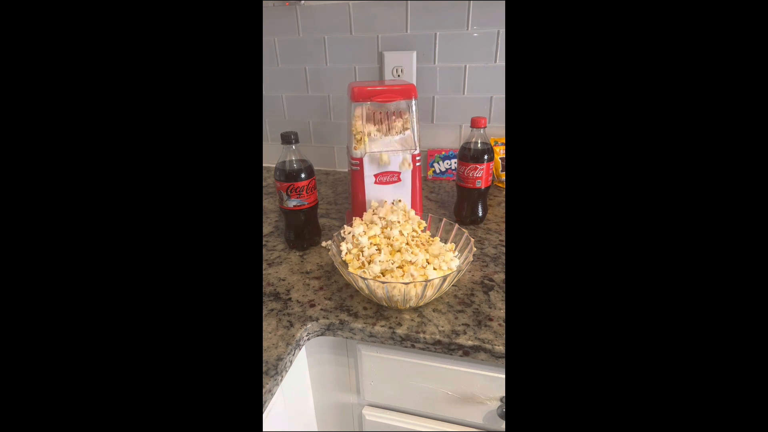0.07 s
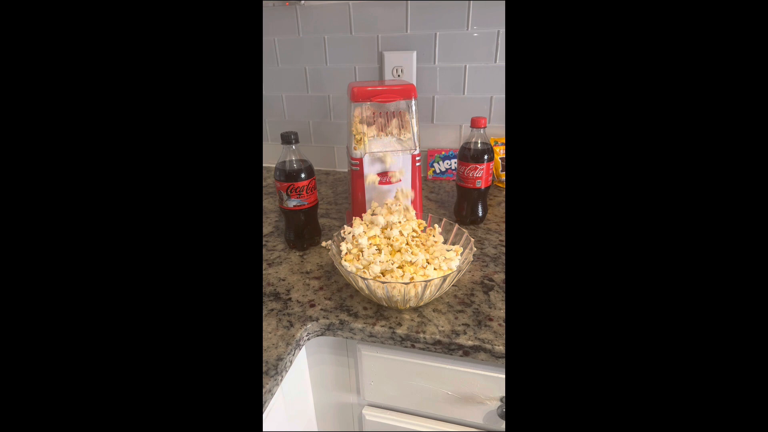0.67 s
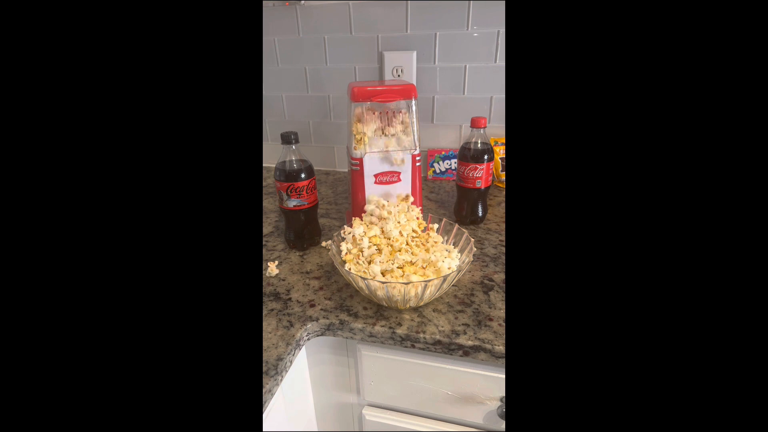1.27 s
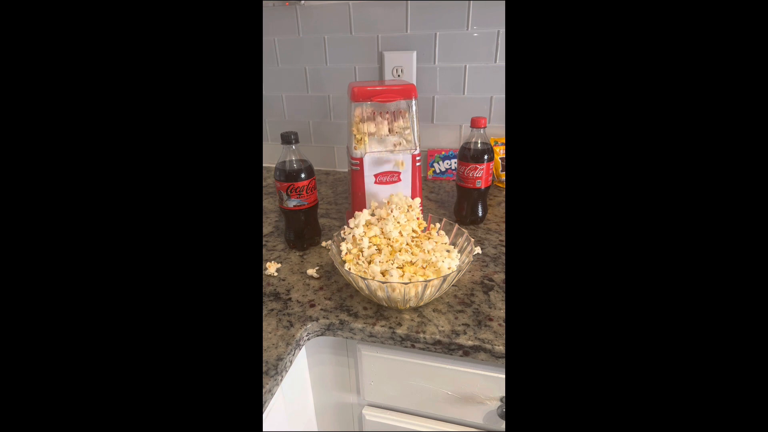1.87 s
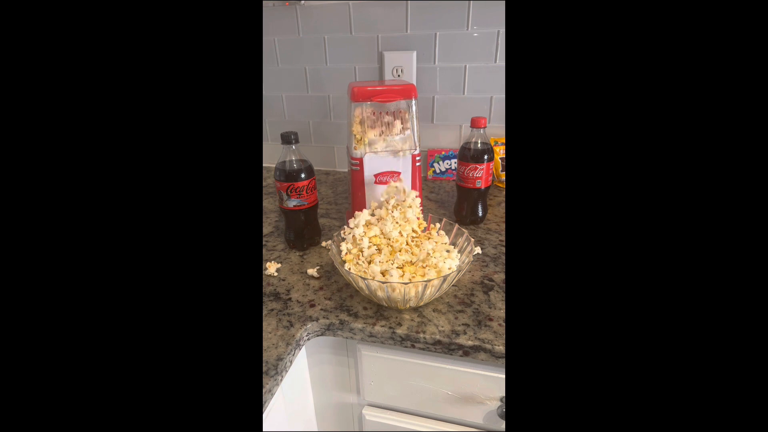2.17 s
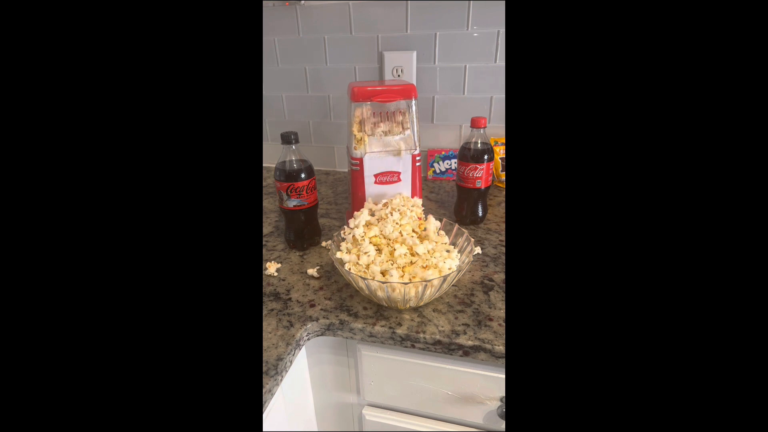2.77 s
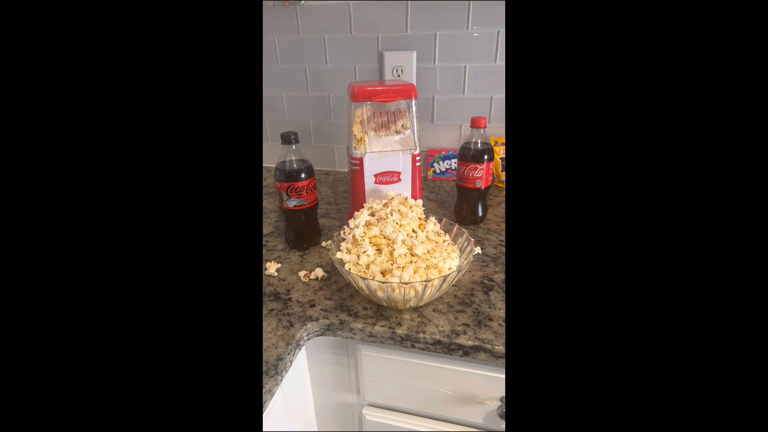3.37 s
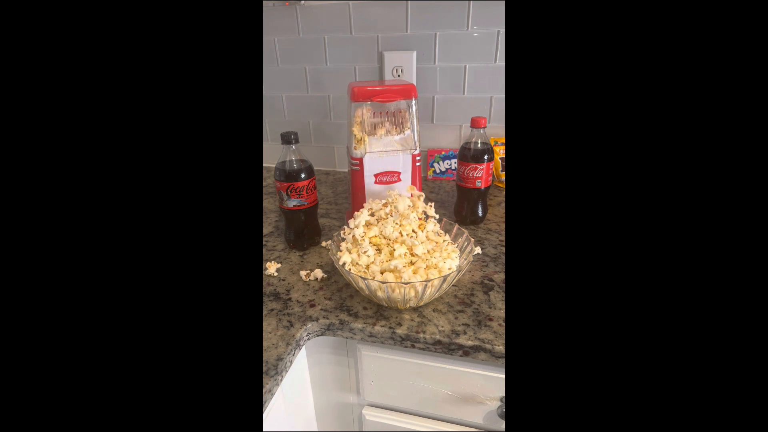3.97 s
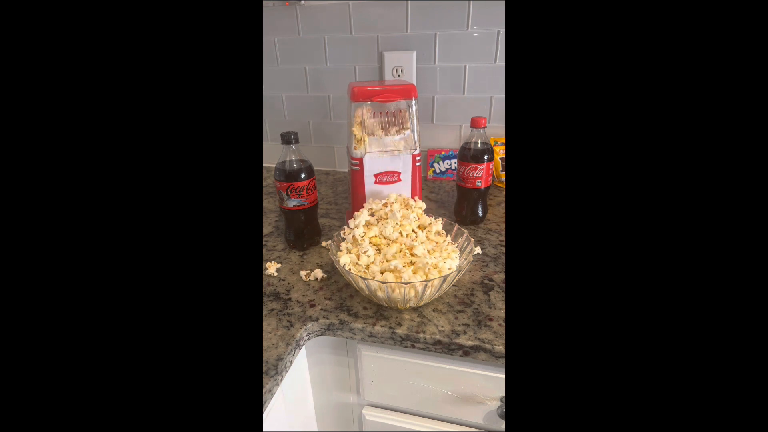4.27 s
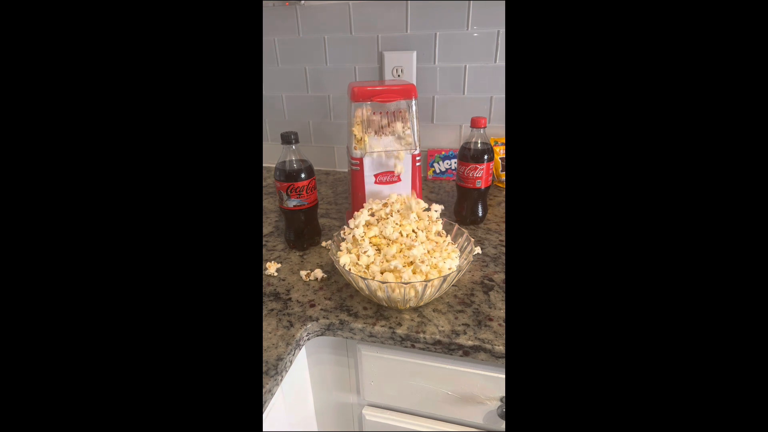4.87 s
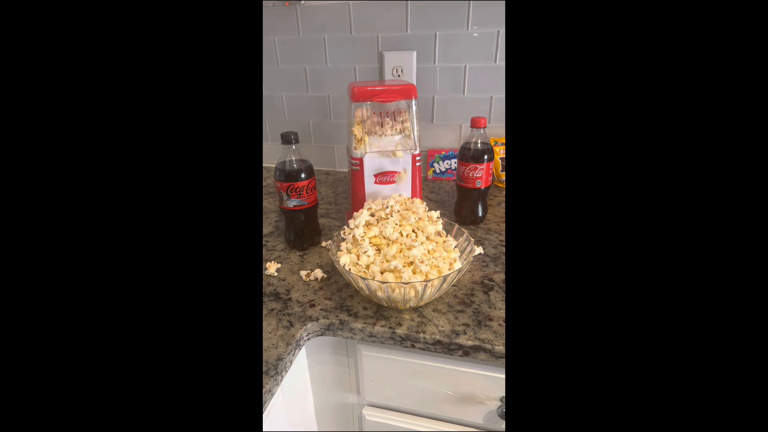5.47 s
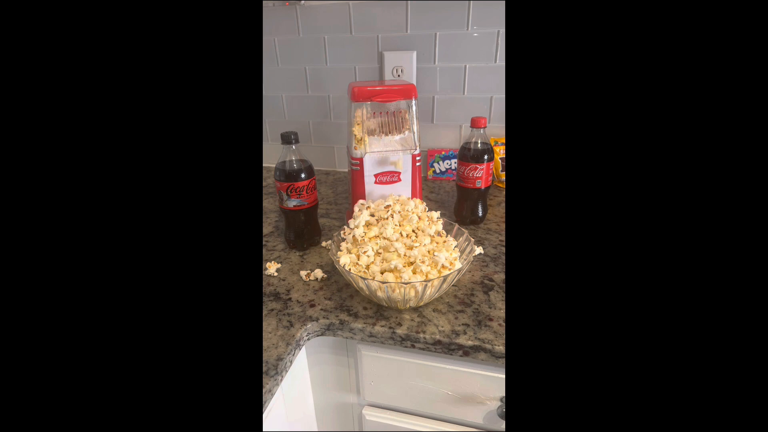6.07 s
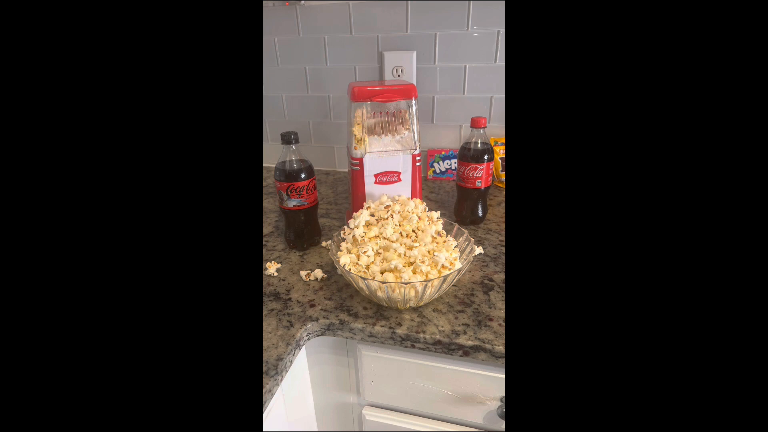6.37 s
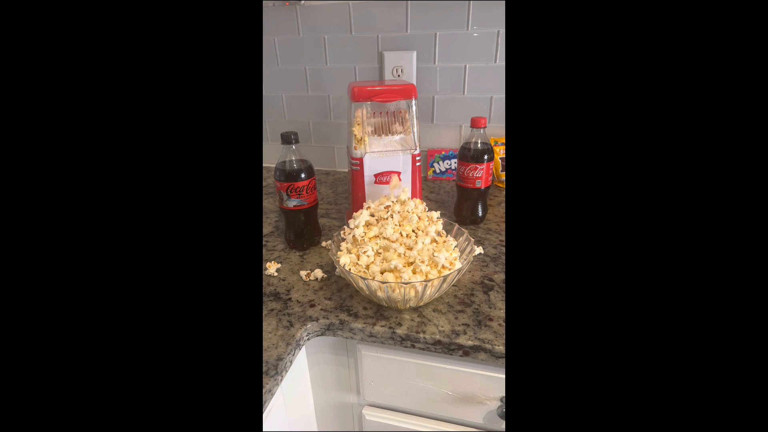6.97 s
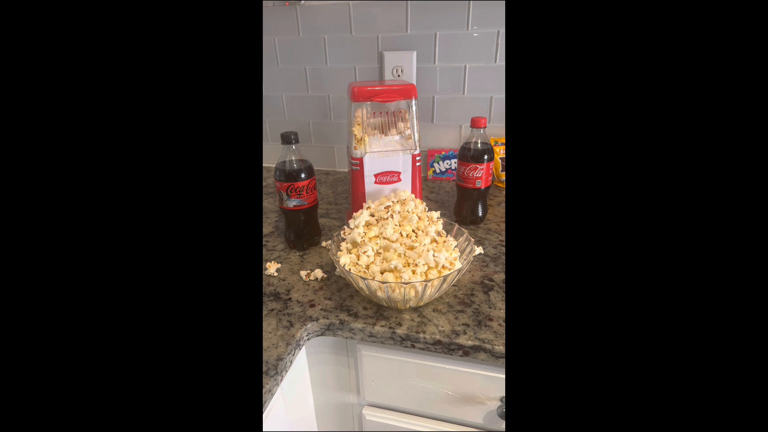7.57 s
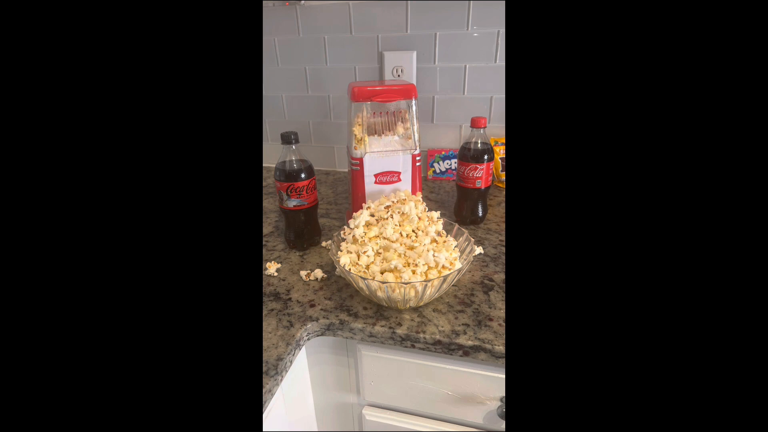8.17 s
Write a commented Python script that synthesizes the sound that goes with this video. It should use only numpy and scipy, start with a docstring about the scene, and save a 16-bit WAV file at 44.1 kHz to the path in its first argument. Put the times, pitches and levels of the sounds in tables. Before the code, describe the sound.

A hot-air popcorn maker runs about a metre away in a tiled kitchen, with a steady motor hum, rushing air and a light metallic rattle of circling kernels. Corn pops quickly and irregularly, each pop a sharp snap with a hollow thump, with a few faint pings and one plastic clack. The popping thins and breaks off after a last flurry. Soft, dry rustles and one late pop follow as the fan keeps running.

```python
"""Tiled kitchen, stone counter: a hot-air popcorn maker runs a metre away.
The motor hums, air rushes through the chamber, the last kernels rattle round the metal cup.
Each pop is one chain: the hull snaps, steam sputters, the swelling kernel thumps the chamber and
kicks the cup. Harder snaps are brighter and spit more steam. Kernels ping the rim, one clacks on
the plastic hood, flakes rustle down the chute; the popping thins out and nearly stops."""
import sys
import numpy as np
from scipy import signal
from scipy.fft import rfft, irfft
from scipy.io import wavfile
from scipy.ndimage import uniform_filter1d

SR = 44100
rng = np.random.default_rng(int(sys.argv[2]) if len(sys.argv) > 2 else 0)


def store_wav(level_fs):
    """Save 16-bit WAV to argv[1]."""
    pcm = np.round(np.clip(np.atleast_2d(level_fs), -1, 1) * 32767)
    wavfile.write(sys.argv[1], SR, pcm.T.astype(np.int16))


N = 362502
TIME_S = np.arange(N) / SR

# motor and impeller tones: shaft_multiple, rms_db
MOTOR_TONES = [(1, -40), (2, -43), (5, -43), (6, -55), (7, -59), (9, -58.5), (10, -55.5), (18, -66),
               (20, -65), (26, -65), (37, -67), (40, -66), (47, -69), (49, -68), (50, -65)]
# shaft speed: time_s, rate_hz
SHAFT_SPEED = [(0, 181), (1.6, 179.2), (4.6, 177.4), (8.2, 178.7)]
# broad air rush: freq_hz, gain_db
RUSH_SPECTRUM = [(20, -29), (40, -4), (60, 5), (130, 3), (200, 0.5), (290, 5), (560, 5.5), (1000, -5),
                 (1300, -16.5), (1900, -9.5), (4500, -14), (9000, -17.5), (12000, -25.5), (15500, -35)]
# duct resonances: pitch_hz, nominal_width_hz, gain_db
DUCT_MODES = [(354.1, 20.8, 2), (409, 24.3, 0.5), (649.6, 55, 0), (695.5, 11.9, 1.5), (859, 28.6, -2.5),
              (896.4, 11, -1.5), (1065, 97, -12.5)]
# cup modes under circling kernels: pitch_hz, gain_db, t60_s
RATTLE_MODES = [(1462, -1, .035), (1528, 0, .035), (3775, -2.5, .055), (4630, -13, .03), (5270, -14, .025),
                (6370, -16, .05)]
# bursting kernels, relative levels: start_s, snap_db, thump_db, knock_db
POP_EVENTS = [(0.0373, -15.5, -26, -22), (0.0528, -17, -11, -32), (0.1251, -15.5, -12.5, -15.5),
              (0.2329, -15, -14.5, -23), (0.303, -7, -23, -35), (0.3443, -11.5, -24, -46),
              (0.382, -12.5, -14.5, -23), (0.403, -4.5, -11.5, -38), (0.4359, -16.5, -7.5, -25),
              (0.505, -11, -21, -21.5), (0.5954, -21.5, -20, -21), (0.6613, -15.5, -9, -14),
              (0.7277, -9, -17.5, -20.5), (0.7575, -13, -12, -21), (0.8274, -17, -14, -22),
              (0.9535, -17.5, -13, -29), (1.0538, -2, -17.5, -24), (1.1384, -7.5, -8.5, -24),
              (1.1575, -13, -7.5, -19), (1.2062, -12, -16, -20), (1.3633, -10.5, -22, -20),
              (1.398, -12, -8.5, -11), (1.4913, -15, -21, -26), (1.4971, -4, -15.5, -20),
              (1.518, -9, -17, -21), (1.5432, -10.5, -10.5, -20), (1.5564, -14, -10, -22),
              (1.6209, -17.5, -14.5, -29), (1.7727, -16, -8.5, -18), (1.8076, -15.5, -12, -20),
              (1.9, -15, -16.5, -26), (1.9786, -5.5, -24, -37), (2.1067, -13.5, -11, -21),
              (2.1245, -11, -19, -18.5), (2.166, -3.5, -25, -30), (2.1868, -10, -15, -24),
              (2.2284, -17, -10.5, -32), (2.3294, -12, -31, -22.5), (2.4435, -21, -21.5, -21.5),
              (2.478, -9.5, -18, -19), (2.532, -12, -26, -41), (2.6104, -8.5, -14.5, -40),
              (2.7562, -13.5, -13.5, -17.5), (2.8881, -7, -31, -23), (2.903, -12.5, -11, -23),
              (3.029, -3.5, -23, -26), (3.068, -21, -15.5, -23), (3.2249, -9, -19.5, -19),
              (3.4051, -18.5, -27, -45), (3.4375, -5, -20, -42), (3.465, -6.5, -16, -26),
              (3.4835, -22, -10, -36), (3.694, -20.5, -10.5, -15.5), (3.8994, -23, -20, -48),
              (3.9645, -3.5, -25, -48), (4.0842, -12.5, -13, -33), (4.135, -4, -27, -31),
              (4.59, -5, -26, -32), (4.6279, -8, -21.5, -27), (4.7053, -15.5, -10.5, -13),
              (5.0564, -5.5, -23, -22.5), (5.1677, -9, -14.5, -39), (5.2668, -7, -14, -25),
              (5.2833, -8.5, -11, -30), (5.3057, -2.5, -17.5, -25), (5.4799, 2, -27, -25),
              (5.4915, -7, -20.5, -29), (7.5034, -5.5, -11, -22)]
# crack heard through the hood: freq_hz, gain_db
CRACK_SPECTRUM = [(40, -68), (200, 6.5), (700, 0), (1300, -3), (1900, -12), (2300, 2.5), (2650, -7),
                  (3150, 3.5), (4000, 1.5), (4900, -1), (5600, -3), (6600, 3), (7800, 4), (11000, -2.5),
                  (15500, -13.5)]
# hood ring after a snap: pitch_hz, gain_db, t60_s
HOOD_MODES = [(2250, -18.5, 0.036), (3110, -3, 0.012), (4760, -9.5, 0.014), (5466, 0, 0.017),
              (5905, 1, 0.016), (7470, -2, 0.01), (8630, -5.5, 0.018), (10920, -4, 0.011)]
# air modes of chamber and hood: pitch_hz, gain_db, t60_s
CHAMBER_MODES = [(102.6, -13.5, 0.1), (116.1, -21, 0.22), (256, -12, 0.11), (359, -3.5, 0.16),
                 (382, -2.5, 0.11), (411.2, 1.5, 0.14), (459, -6.5, 0.059), (570, -33, 0.04),
                 (658, -7, 0.084), (696.5, -4.5, 0.085), (848, -1, 0.029), (1192, -25, 0.028)]
# metal cup, kicked: pitch_hz, gain_db, t60_s
CUP_MODES = [(1154, 11.5, 0.057), (1450, -33, .03), (1501, 16, 0.047), (1486, 13.5, 0.12),
             (1425, -28, 0.23), (2230, -35, 0.076)]
# kernels on the cup rim: start_s, level_db
RIM_HITS = [(.129, -25.5), (.833, -27.5), (1.627, -33.5), (2.81, -38), (4.714, -30.5)]
# cup rim: pitch_hz, gain_db, t60_s
RIM_MODES = [(3780, 0, .09), (4160, -5, .06)]
# kernel on the hood: start_s, level_db
HOOD_HITS = [(3.027, -14.5)]
# plastic clack: freq_hz, gain_db
CLACK_SPECTRUM = [(400, -32), (1200, 1), (2400, -4.5), (4500, -9.5)]
# flakes down the chute: start_s, level_db
FLAKE_SLIDES = [(4.33, -61), (5.736, -41.5), (5.967, -48), (6.244, -45), (6.849, -48), (7.295, -49),
                (7.951, -41.5), (8.168, -47)]
# flake rustle: freq_hz, gain_db
FLAKE_SPECTRUM = [(800, -25), (4000, -10), (7500, 5.5), (10500, 2), (15000, -18)]
# stereo width: freq_hz, side_gain_db
SIDE_SPECTRUM = [(25, -15), (60, -34), (200, -37), (380, -15), (700, -6.5), (1300, -8), (3000, -4),
                 (8000, -1), (15000, -1)]
# stereo balance: freq_hz, left_minus_right_db
BALANCE = [(90, 1), (220, 3), (400, 3), (700, 3), (1200, 0), (4000, 0.9), (9000, 0)]


def undb(db):
    """Decibels to gain."""
    return 10 ** (np.asarray(db) / 20)


def unit(x):
    """Scale to rms 1."""
    return x / np.sqrt(np.mean(x ** 2))


def colour(x, curve):
    """Filter by a (freq_hz, gain_db) curve."""
    hz, db = np.transpose(curve)
    bins_hz = np.maximum(np.fft.rfftfreq(x.shape[-1], 1 / SR), 1)
    gain = undb(np.interp(np.log(bins_hz), np.log(hz), db))
    return irfft(rfft(x) * gain, x.shape[-1])


def drift(rate_hz):
    """Smooth random drift, rms 1."""
    hold = int(SR / rate_hz)
    steps = np.repeat(rng.standard_normal(N // hold + 2), hold)
    return unit(uniform_filter1d(uniform_filter1d(steps, hold), hold)[:N])


def add(track, start_s, sound):
    """Mix a sound in at start_s."""
    i = max(int(start_s * SR), 0)
    track[..., i:i + sound.shape[-1]] += sound[..., :N - i]


def fade(t, t60_s):
    """Exponential decay, 60 dB in t60_s."""
    return np.exp(-np.log(1000) * t / t60_s)


def burst(shape, energy_s):
    """Scale to the energy of rms 1 held for energy_s."""
    return shape * np.sqrt(energy_s * SR / np.sum(shape ** 2))


def ring(modes, detune, scatter_db):
    """One blow on damped modes; each blow shifts their pitch and share at random."""
    hz, db, t60_s = np.transpose(modes)[:, :, None]
    t = TIME_S[:SR // 6]
    shift, share = rng.standard_normal((2, len(modes), 1))
    partials = np.sin(2 * np.pi * hz * (1 + detune * shift) * t)
    return np.sum(undb(db + scatter_db * share) * fade(t, t60_s) * partials, axis=0)


def splinter(spectrum, t60_s, ragged_db):
    """Fading spray of tiny fractures: noise with a new level each millisecond."""
    t = TIME_S[:SR // 10]
    knots_s = t[::SR // 1000]
    size_db = ragged_db * np.interp(t, knots_s, rng.standard_normal(len(knots_s)))
    return colour(rng.standard_normal(len(t)) * undb(size_db), spectrum) * fade(t, t60_s)


def stereo(mid, side):
    """Two channels, alike in the bass, apart in the treble."""
    return mid + np.array([[1], [-1]]) * colour(side, SIDE_SPECTRUM)


def kitchen(x, early_db, tail_db, t60_s, treble_t60_s):
    """Sparse reflections off counter and tiles, then the diffuse room tail."""
    t = TIME_S[:SR // 2]
    shape = (2, len(t))
    early = rng.standard_normal(shape) * (rng.random(shape) < .03) * fade(t, .057) * (t > .002)
    low = signal.sosfilt(signal.butter(2, 6500, "low", fs=SR, output="sos"), rng.standard_normal(shape))
    top = signal.sosfilt(signal.butter(2, 6500, "high", fs=SR, output="sos"), rng.standard_normal(shape))
    build_up = np.clip((t - .005) / .018, 0, 1)
    tail = (low * fade(t, t60_s) + top * fade(t, treble_t60_s)) * build_up
    responses = (undb(early_db) * burst(echoes, 1 / SR) + undb(tail_db) * burst(diffuse, 1 / SR)
                 for echoes, diffuse in zip(early, tail))
    mid, side = (signal.fftconvolve(x, response)[:N] for response in responses)
    return stereo(x + mid, undb(-1) * side)


def motor(mains_hz=119, mains_rms_db=-47.5):
    """Shaft harmonics waver with the load, over a steady mains buzz."""
    shaft_hz = np.interp(TIME_S, *np.transpose(SHAFT_SPEED)) * (1 + .0008 * drift(5))
    turns = np.cumsum(shaft_hz) / SR
    hum = undb(mains_rms_db) * np.sin(2 * np.pi * mains_hz * TIME_S)
    for multiple, db in MOTOR_TONES:
        flutter_db = min(multiple / 3, 1) * drift(12)
        hum += undb(db + flutter_db) * np.sin(2 * np.pi * (multiple * turns + rng.random()))
    return np.sqrt(2) * hum


def airflow(rush_db=-36, duct_db=-29.5):
    """Turbulent air: a broad rush plus duct resonances, each fluttering on its own."""
    bins_hz = np.fft.rfftfreq(N, 1 / SR)
    rush = unit(colour(rng.standard_normal((2, N)), RUSH_SPECTRUM)) * undb(.069 * drift(17))
    turbulence = rfft(rng.standard_normal((2, N)))
    duct = np.zeros((2, N))
    for hz, width_hz, db in DUCT_MODES:
        offset = (bins_hz - hz) / (.8 * width_hz)
        duct += undb(db + .5 * drift(12)) * irfft(turbulence / (1 + 1j * offset) ** 2, N)
    return stereo(*(undb(rush_db) * rush + undb(duct_db) * unit(duct)))


def kernel_rattle(level_db=-43, strikes_per_s=240, spread_db=2):
    """Unpopped kernels whirl round the cup; uneven strikes keep it ringing."""
    strikes = (rng.random(N) < strikes_per_s / SR) * rng.standard_normal(N)
    strikes *= undb(spread_db * np.minimum(rng.exponential(size=N), 2))
    rattle = signal.fftconvolve(strikes, ring(RATTLE_MODES, detune=0, scatter_db=0))[:N]
    return kitchen(undb(level_db) * unit(rattle), early_db=-13, tail_db=-10, t60_s=.33, treble_t60_s=.27)


def hull_cracks(trim_db=-11.5, usual_snap_db=-8.5, usual_steam_db=-25.5, scatter_db=1.87,
                snap_delay_s=.00065, steam_delay_s=.0035, spot_count=5):
    """Hull snaps, hood rings, steam sputters. Harder snaps are brighter and spit more steam."""
    spots = np.zeros((spot_count, N))  # each spot in the chamber has its own echo
    scattered = np.zeros(N)
    hz, crack_db = np.transpose(CRACK_SPECTRUM)
    octaves = np.log2(np.maximum(hz, 1500) / hz[-1])
    for k, (start_s, snap_db, _, _) in enumerate(POP_EVENTS):
        force_db = snap_db - usual_snap_db
        hull_db = crack_db + scatter_db * rng.standard_normal(len(hz))
        tilt_db = min(force_db, 5.5) * octaves  # brightening saturates
        snap_spectrum = np.column_stack([hz, hull_db + 1.05 * tilt_db])
        steam_spectrum = np.column_stack([hz, hull_db + .38 * tilt_db])
        snap_gain, steam_gain = undb(snap_db + trim_db), undb(usual_steam_db + .68 * force_db)
        spot = spots[k % spot_count]
        for track in (spot, scattered):
            snap = splinter(snap_spectrum, t60_s=.013, ragged_db=1.5)
            steam = splinter(steam_spectrum, t60_s=.09, ragged_db=3)
            add(track, start_s + snap_delay_s, snap_gain * burst(snap, .003))
            add(track, start_s + steam_delay_s, steam_gain * burst(steam, .018))
        hood = ring(HOOD_MODES, detune=.012, scatter_db=1.8)
        add(spot, start_s + snap_delay_s, snap_gain * burst(hood, .003))
    echoing = sum(kitchen(spot, early_db=-6.5, tail_db=-9, t60_s=.42, treble_t60_s=.29) for spot in spots)
    left, right = echoing + stereo(0, undb(-5) * scattered)
    return np.array([np.roll(left, 1), right])  # left lags one sample


def pop_thumps(thump_trim_db=1, knock_trim_db=-3.5, swell_s=.004,
               thump_delay_s=.0011, knock_delay_s=.002934):
    """Swelling starch pushes the chamber air; the kernel kicks the cup."""
    out = np.zeros(N)
    swell = np.minimum(TIME_S[:SR // 6] / swell_s, 1)
    for start_s, _, thump_db, knock_db in POP_EVENTS:
        thump = ring(CHAMBER_MODES, detune=.015, scatter_db=2.2) * swell
        knock = ring(CUP_MODES, detune=.007, scatter_db=4)
        add(out, start_s + thump_delay_s, undb(thump_db + thump_trim_db) * burst(thump, .007))
        add(out, start_s + knock_delay_s, undb(knock_db + knock_trim_db) * burst(knock, .006))
    return out


def trimmed_room(x, low_cut_hz=58):
    """The deepest rumble of the push is cut away; the rest rings in the room."""
    passed = signal.sosfilt(signal.butter(3, low_cut_hz, "high", fs=SR, output="sos"), x)
    return kitchen(passed, early_db=-18, tail_db=-14, t60_s=.36, treble_t60_s=.25)


def rim_pings():
    """Hard kernels ring the rim of the cup."""
    out = np.zeros(N)
    for start_s, db in RIM_HITS:
        add(out, start_s, undb(db) * burst(ring(RIM_MODES, detune=.002, scatter_db=2), .012))
    return out


def hood_clack():
    """A flung kernel hits the plastic hood: short, hollow clack."""
    out = np.zeros(N)
    for start_s, db in HOOD_HITS:
        add(out, start_s, undb(db) * burst(splinter(CLACK_SPECTRUM, t60_s=.07, ragged_db=2), .007))
    return kitchen(out, early_db=-9, tail_db=-3, t60_s=.36, treble_t60_s=.28)


def flake_rustle():
    """Light popcorn brushes down the chute onto the heap: soft, dry rustle."""
    out = np.zeros(N)
    for start_s, db in FLAKE_SLIDES:
        add(out, start_s, undb(db) * burst(splinter(FLAKE_SPECTRUM, t60_s=.2, ragged_db=5), .03))
    return kitchen(out, early_db=-9, tail_db=-5, t60_s=.33, treble_t60_s=.27)


def scene():
    """Machine and popcorn, low mids slightly left."""
    popping = hull_cracks() + trimmed_room(pop_thumps() + rim_pings())
    left, right = popping + hood_clack() + kernel_rattle() + flake_rustle() + motor() + airflow()
    hz, db = np.transpose(BALANCE)
    return np.array([colour(left, np.column_stack([hz, db / 2])),
                     colour(right, np.column_stack([hz, -db / 2]))])


def record(dry):
    """Soft peak limit, then a steep low-pass."""
    ceiling, cutoff_hz = .8, 15900
    rounded = dry / (1 + (dry / ceiling) ** 6) ** (1 / 6)
    return signal.sosfilt(signal.ellip(10, .2, 90, cutoff_hz, fs=SR, output="sos"), rounded)


dry = scene()
out = record(dry)
store_wav(out)
```